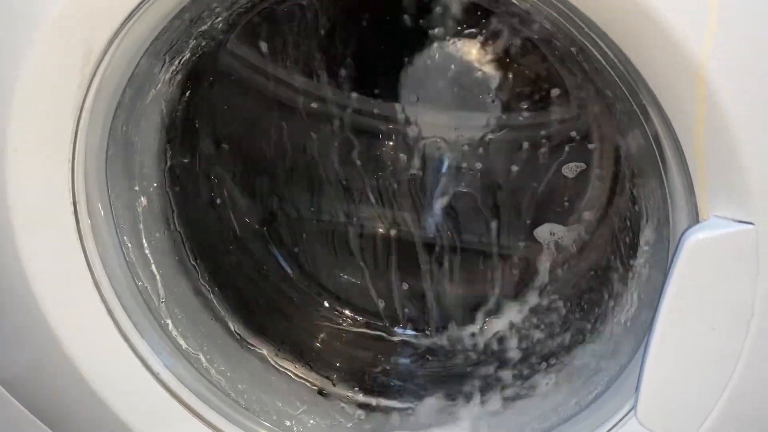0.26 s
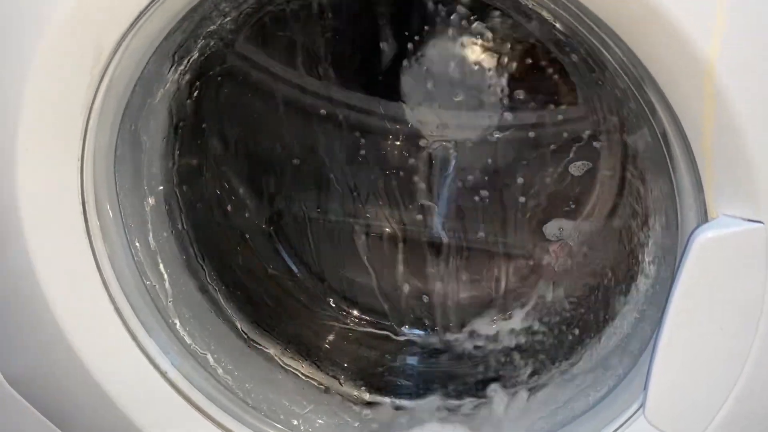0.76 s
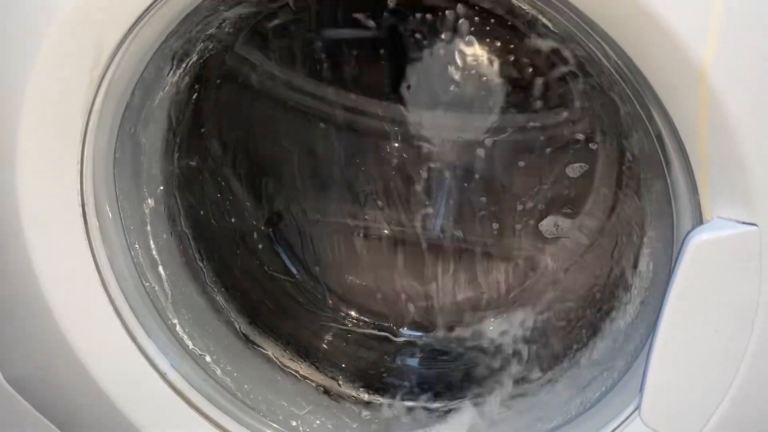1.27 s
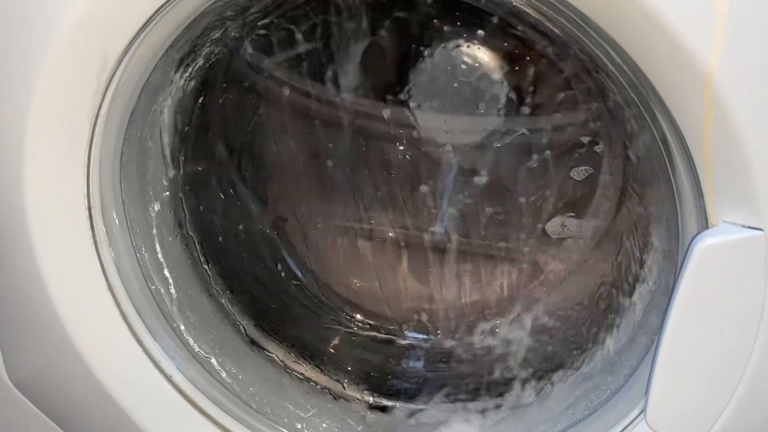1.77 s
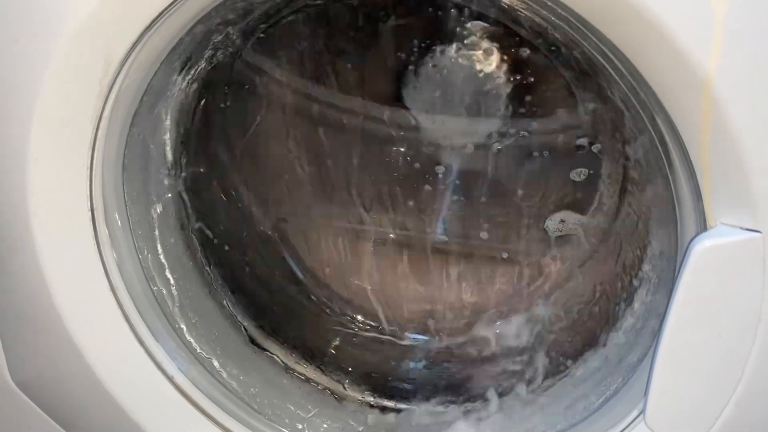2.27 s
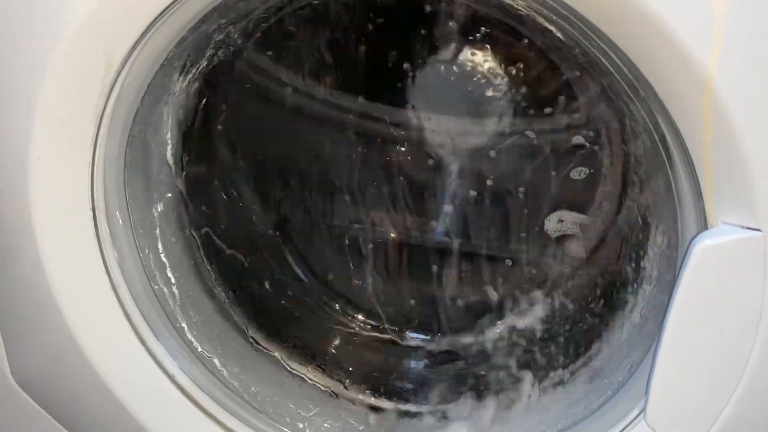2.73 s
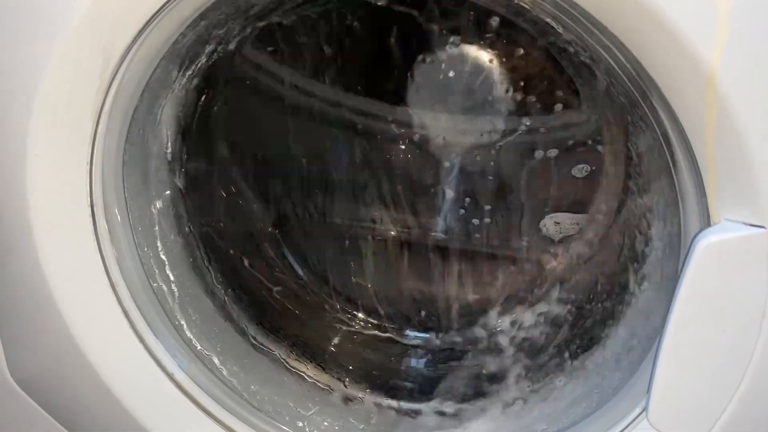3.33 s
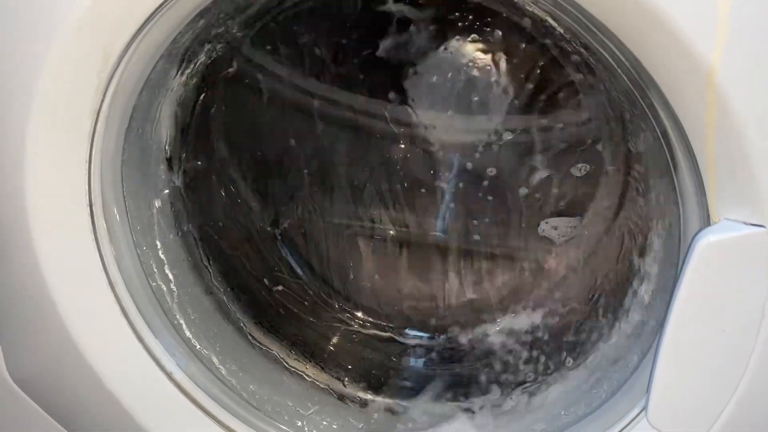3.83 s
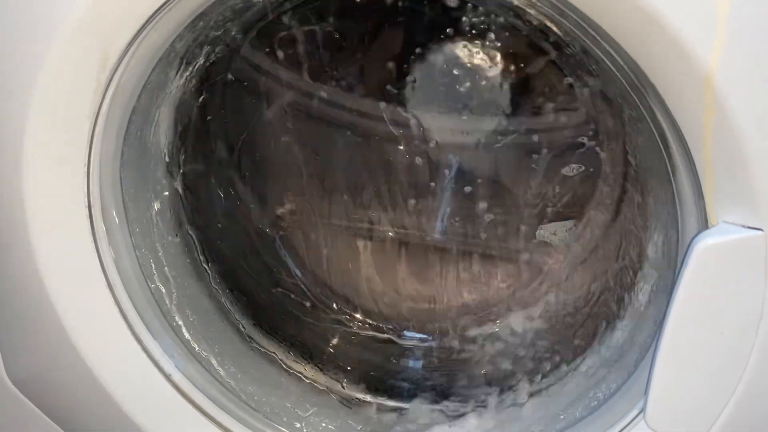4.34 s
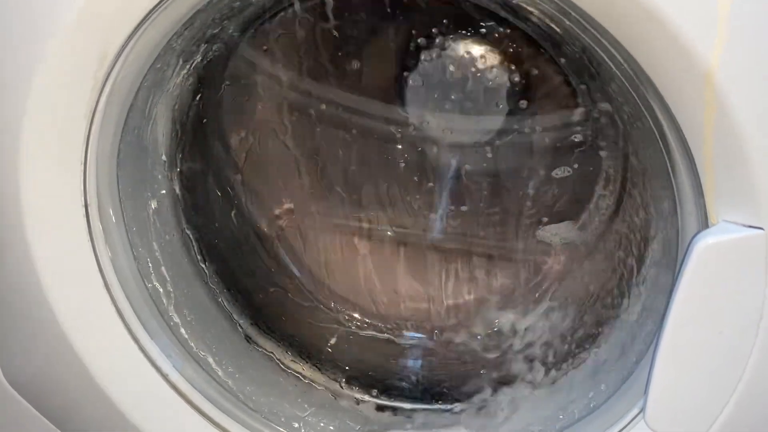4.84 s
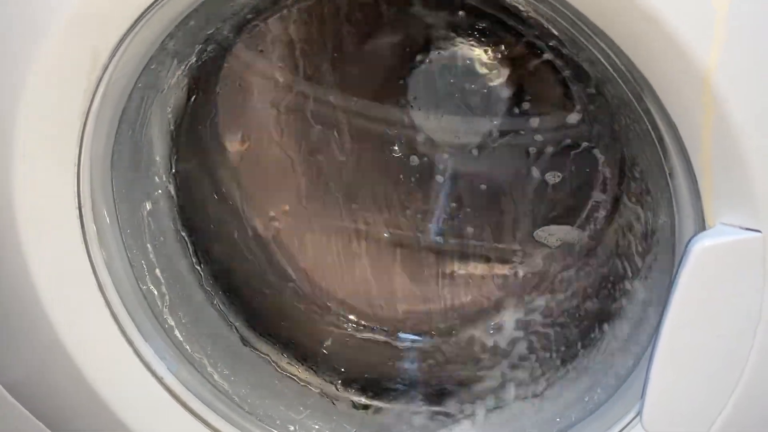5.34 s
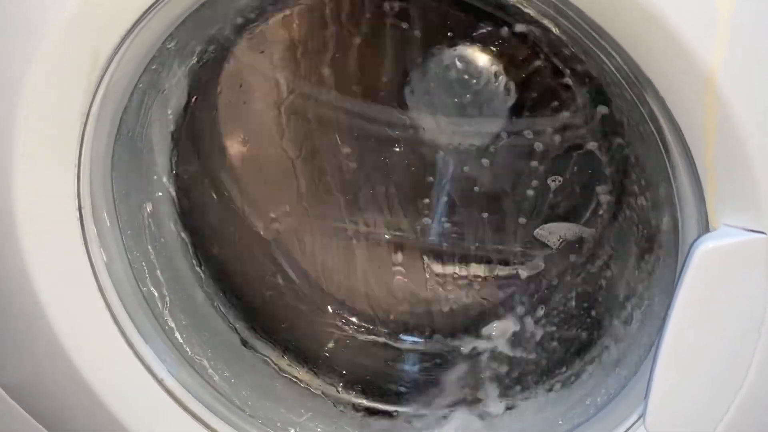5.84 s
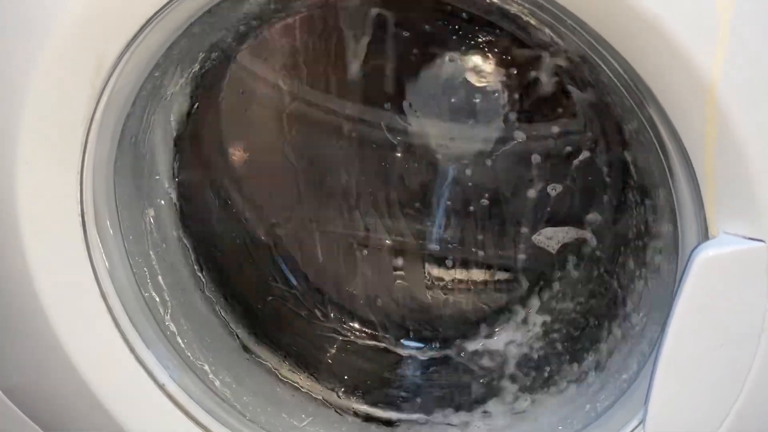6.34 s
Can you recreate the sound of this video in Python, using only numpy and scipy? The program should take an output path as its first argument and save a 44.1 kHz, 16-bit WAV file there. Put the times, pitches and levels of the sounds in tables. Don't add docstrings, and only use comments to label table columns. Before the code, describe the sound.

Close stereo capture of a front-loading washing machine already in fast spin indoors. A very loud, deep hum throbs about twenty times a second as the unbalanced drum jolts the cabinet. A loose part clatters in a quick repeating pattern over rattling, with a thin motor whine and broad watery hiss behind. Continuous throughout, slightly rougher in the middle, never stopping.

```python
import sys
import numpy as np
from scipy import signal
from scipy.fft import irfft
from scipy.io import wavfile
from scipy.ndimage import uniform_filter1d, map_coordinates

SR = 44100
rng = np.random.default_rng(int(sys.argv[2]) if len(sys.argv) > 2 else 0)


def linear_from_db(decibels):
    return 10 ** (np.asarray(decibels, float) / 20)


def wav_out(sig):
    wavfile.write(sys.argv[1], SR, np.round(np.clip(np.atleast_2d(sig).T, -1, 1) * 32767).astype(np.int16))


N = 291060
TIME = np.arange(N) / SR

# [t/s, speed/(turns per s)]
DRUM_SPEED = [(0.0, 19.656), (0.6, 19.776), (1.2, 19.837), (1.8, 19.874), (2.4, 19.883), (3.0, 19.872),
              (3.6, 19.838), (4.2, 19.795), (4.8, 19.761), (5.4, 19.728), (6.0, 19.706), (6.6, 19.695)]
# [f/Hz, density/dB per Hz]
HISS_SPECTRUM = [(20, -25), (70, -3.5), (370, -5), (800, -6.5), (1600, -8), (2100, -14), (3000, -16),
                 (4300, -20), (5500, -21.5), (6600, -23.5), (8500, -20), (11500, -23.5), (14000, -22),
                 (15700, -16.5)]
# [f/Hz, width/Hz, level/dB]
DOOR_MODES = [(363, 52, -3), (740, 22, 2), (770.4, 32, 10.5), (1175, 29, -6), (2390, 97, 1.5),
              (3000, 200, 4.5), (4290, 420, 5), (954, 75, 4), (1697, 62, -8), (1923, 37, -5),
              (2245, 39, -4), (2800, 46, -3.5), (3010, 43, -8), (7860, 170, -11.5)]
# [shaft order, level/dB]
MOTOR_ORDERS = [(14, -60), (15, -62), (16, -59), (17, -55), (19, -60), (22, -58), (25, -59), (30, -62),
                (31, -63), (33, -58), (34, -63), (37, -60), (40, -63), (41, -57), (42, -61), (43, -55),
                (44, -63), (45, -63), (53, -59), (55, -62), (58, -55), (61, -63), (62, -59), (64, -61),
                (65, -61), (66, -50)]
# [shaft order, free-running level/dB, climbing boost/dB, sagging boost/dB]
WHINES = [
    (18, -50, 2, 8),
    (36, -44, 3, 3.5),
]
# [drum order, f/Hz, width/Hz, peak level/dB, left minus right/dB]
PANEL_MODES = [(12, 238, 4, -41, -6), (12.5, 246.8, 1.6, -30, 0), (13, 257.2, 4, -35, -2),
               (18, 357.6, 3.5, -35, -3), (19, 374.5, 8, -43, 2)]
# [f/Hz, level/dB]
RATTLE_SPECTRUM = [(30, -12), (90, 5), (150, -11), (240, -7.5), (300, -7), (380, -4.5), (500, -10.5),
                   (620, -12), (690, -9)]
# [place/0-1, level/dB, brightness slope/dB per octave]
KNOCK_PATTERN = [
    (.04, -3, -4),
    (.13, -9, -6),
    (.37, -9, -2),
    (.53, 0, 3),
    (.6, -3, -5),
    (.69, -6, -7),
    (.76, -8, 0),
    (.865, -2, -2),
]
# [f/Hz, level/dB, t60/s]
PART_MODES = [(385, -3, .08), (550, -7, .07), (697, -3, .09), (765, 3, .06), (950, -6, .05),
              (1075, -5, .08), (1158, -2, .1), (1395, -1, .07), (1570, -8, .05), (2900, -17, .03)]
JOLTS = [
    (0.211, 0.14),
    (0.284, 0.48),
    (0.474, 0.86),
    (0.992, 0.76),
]
# [f/Hz, width/Hz, signed response]
CABINET_MODES = [(52.835, 5.44, -0.359), (111.708, 12.649, 0.254), (179.234, 2.0, 0.097),
                 (198.746, 3.542, 0.042), (161.352, 71.934, -0.034)]
# [order, left/dB, right/dB, growth share, lag/rad], last two per 0.1 turns/s
ORDER_REACH = [(2, 2, -2, .1, 0), (3, 1.5, .5, .22, .4), (4, 1.5, -.6, .1, .35), (5, 1, -.7, -.1, .5),
               (6, .8, -1.2, 0, 0), (7, 2, 0, .35, 0), (8, 4, .5, 0, .7), (9, 4, -6, .1, 0),
               (10, 3, -5, .15, 0), (11, .5, -.5, .4, 0)]
# [f/Hz, shared part/0-1]
PORT_LIKENESS = [(30, 1), (100, .98), (300, .7), (600, .4), (1000, .3), (1600, .1), (3000, .6), (5500, .35),
                 (6800, .97), (8500, .995)]
# [f/Hz, left minus right/dB]
PORT_TILT = [(60, 16.5), (250, 0.5), (600, 1), (2000, 1), (5000, 2), (7000, 5), (9000, -0.9)]
# [f/Hz, phase/turns]
PORT_PHASE = [(0, 0), (500, -.05), (900, -.15), (1500, -.25), (2300, -.02), (3900, -.1), (4300, -.17),
              (4700, -.04), (5700, 0), (7100, 0), (9200, .5), (11100, 1), (13200, 1.5), (15250, 2),
              (16000, 2.2)]

BELT_RATIO, SHAFT_HZ = 11.99, 237.5
MEAN_SPEED, CRITICAL_SPEED, SPEED_MARGIN = 19.8, 19.775, .012
SHAKE_LAG_S = .4


def evened(x):
    return x / np.sqrt(np.mean(abs(x) ** 2) + 1e-20)


def read(points, hz):
    f, value = np.transpose(points)
    return np.interp(np.log(hz + 1), np.log(f + 1), value)


def above(speed, threshold):
    return .5 + .5 * np.tanh((speed - threshold) / (2 * SPEED_MARGIN))


def drift(top_hz):
    hz = np.geomspace(.15, top_hz, 20)
    t = TIME[::441, None]
    slow = (np.sin(2 * np.pi * (hz * t + rng.random(20))) / np.sqrt(hz)).sum(1)
    return np.interp(TIME, t[:, 0], evened(slow))


def ports(hz):
    tilt = linear_from_db(read(PORT_TILT, hz) / 2)
    phase = np.interp(hz, *np.transpose(PORT_PHASE))
    return np.array([tilt + 0j, np.exp(2j * np.pi * phase) / tilt])


def pair(shape, hz):
    a, b, c, d = rng.standard_normal((4,) + shape) / np.sqrt(2)
    left, own = a + 1j * b, c + 1j * d
    same = np.clip(read(PORT_LIKENESS, hz), 0, 1)
    right = same * left + np.sqrt(1 - same ** 2) * own
    return np.array([left, right]) * ports(hz)[:, None]


def cyclic(cycles, spectra, size):
    tables = irfft(spectra, size) * size / np.sqrt(2)
    tables = np.concatenate([tables, tables[..., :1]], axis=2)
    where = [np.linspace(0, spectra.shape[1] - 1, N), cycles % 1 * size]
    return np.array([map_coordinates(table, where, order=1) for table in tables])


def hiss(turns, shake):
    frames, hz = N // 256 + 5, np.fft.rfftfreq(1024, 1 / SR)
    patches = uniform_filter1d(rng.standard_normal((frames, 513)), 12, axis=0)
    patches = evened(uniform_filter1d(patches, 12, axis=1))
    peaks_db = sum(db / (1 + (2 * (hz - f) / width) ** 2) for f, width, db in DOOR_MODES)
    spectra = pair((frames, 513), hz) * linear_from_db(read(HISS_SPECTRUM, hz) + peaks_db + 0.25 * patches)
    noise = signal.istft(spectra.transpose(0, 2, 1), nperseg=1024, noverlap=768)[1]
    noise = evened(noise[:, :N])
    pulse_db = 0.71 * np.cos(np.pi * turns - 4.1)
    pulse_db += 0.85 * np.cos(2 * np.pi * turns - 1.2)
    pulse_db += 0.72 * np.cos(4 * np.pi * turns - .7)
    body = signal.sosfiltfilt(signal.butter(3, 4500, fs=SR, output="sos"), noise)
    treble = noise - body
    return linear_from_db(-27.5) * (linear_from_db(3 + 0.36 * shake + pulse_db) * body + linear_from_db(.3 * pulse_db) * treble)


def motor(turns, climbing, sagging):
    shaft, order = BELT_RATIO * turns, np.arange(67)
    level_db = np.full(67, -66.) - 60 * (order < 14)
    for k, db in MOTOR_ORDERS:
        level_db[k] = db
    level_db[[18, 36]] = -90
    steady = np.exp(2j * np.pi * rng.random(67))
    contact = rng.standard_normal((200, 67)) + 1j * rng.standard_normal((200, 67))
    flicker = .85 * steady + .5 * contact
    out = cyclic(shaft, linear_from_db(level_db + 3.2) * flicker * ports(order * SHAFT_HZ)[:, None], size=2048)
    beat = np.exp(-2j * np.pi * (turns - .045))
    out *= 1 + .1 * beat.real
    for k, db, climb_db, sag_db in WHINES:
        k = round(k)
        slip = uniform_filter1d(rng.standard_normal(N), 500)
        wander = k * .014 * evened(uniform_filter1d(slip, 500))
        level = linear_from_db(db + climb_db * climbing + sag_db * sagging + drift(1.2))
        tone = np.sqrt(2) * level * np.exp(1j * (2 * np.pi * k * shaft + wander))
        loaded = tone * (1 + (k / 52) ** 2 * beat)
        out += (ports(k * SHAFT_HZ)[:, None] * loaded).real
    return out * (1 + .12 * np.cos(4 * np.pi * turns + 1.3))


def panels(turns, speed):
    out = np.zeros((2, N))
    for order, hz, width, db, left_db in PANEL_MODES:
        tuned = 1 / (1 + (2 * (order * speed - hz) / width) ** 2)
        balance_db = np.array([[left_db], [-left_db]]) / 2
        level = tuned * linear_from_db(db + 3 + drift(2.0) + balance_db)
        out += level * np.cos(2 * np.pi * order * turns + 0.83 * drift(2.5) + 6 * rng.random())
    return out


def rattle(turns):
    half = np.arange(72)
    hz = half * 9.9
    odd = half % 2
    heard = (half > 4) * ((half > 22) | (odd == 1))
    gain = linear_from_db(read(RATTLE_SPECTRUM, hz) - 6 * odd) * heard
    spectra = pair((16, len(half)), hz) * gain
    return linear_from_db(-27) * evened(cyclic(turns / 2, spectra, size=4096))


def knocks(turns, shake):
    cycles, t, out = np.arange(-1, 67), np.arange(4400) / SR, np.zeros((2, N))
    places, dbs, slopes = np.transpose(KNOCK_PATTERN)
    chance = rng.standard_normal((len(cycles), len(places), 1 + len(PART_MODES)))
    blow_turns = 2 * (cycles[:, None] + places + 0.0015 * chance[..., 0])
    at = np.interp(blow_turns, turns, np.arange(N), 0, N).astype(int)
    signs = rng.choice([-1., 1.], (len(PART_MODES), len(places)))
    swing = 1 - np.exp(-t / .003)
    for k, (hz, db, t60) in enumerate(PART_MODES):
        octaves = np.log2(hz / 700)
        blows = np.zeros(N + 1)
        blows[at] = signs[k] * linear_from_db(dbs + slopes * octaves + 1.4 * chance[..., k + 1])
        blows[1:] *= linear_from_db(-3 * octaves * (1 - shake))
        ring = linear_from_db(db - 60 * t / t60) * swing * np.exp(2j * np.pi * hz * t)
        apart = np.exp(.5j * np.array([[-1], [1]]) * rng.uniform(-1, 1))
        ringing = signal.oaconvolve(blows[1:N], ring)[:N]
        out += (apart * ports(hz)[:, None] * ringing).real
    out = signal.sosfilt(signal.butter(3, 280, "high", fs=SR, output="sos"), out)
    return linear_from_db(-33 + 2.5 * shake) * evened(out)


def hum(speed, turns):
    out = np.zeros((2, N))
    slow_speed = speed[::64]
    faster = 10 * (slow_speed - MEAN_SPEED)
    for order, left_db, right_db, growth, lag in ORDER_REACH:
        hz = order * slow_speed
        force = sum(strength * np.exp(-2j * np.pi * order * place) for place, strength in JOLTS)
        response = sum(a * 1j * hz * w / (f * f - hz * hz + 1j * hz * w) for f, w, a in CABINET_MODES)
        motion = force * response * (1 + growth * faster) * np.exp(-1j * lag * faster)
        motion = np.repeat(motion, 64)[:N]
        reach = linear_from_db(np.array([[left_db], [right_db]]))
        out += reach * (motion * np.exp(2j * np.pi * order * turns)).real
    return out


def scene():
    speed = np.interp(TIME, *np.transpose(DRUM_SPEED))
    turns = .092 + np.cumsum(speed) / SR
    shake = above(np.interp(TIME - SHAKE_LAG_S, TIME, speed), CRITICAL_SPEED)
    panel_speed = np.interp(TIME - SHAKE_LAG_S / 2, TIME, speed)
    slow = 1 - above(speed, MEAN_SPEED - SPEED_MARGIN)
    late = TIME > TIME[speed.argmax()]
    background = hiss(turns, shake) + motor(turns, slow * ~late, slow * late)
    body = panels(turns, panel_speed) + rattle(turns)
    return background + body + knocks(turns, shake) + hum(speed, turns)


def band_limit(x):
    return signal.sosfilt(signal.butter(12, 17050, fs=SR, output="sos"), x)


def record(dry):
    knee, headroom = .7, .24
    over = np.maximum(abs(dry) - knee, 0)
    held = dry - np.sign(dry) * (over - headroom * np.tanh(over / headroom))
    edge = signal.firwin(767, 15755, window=("kaiser", 9), fs=SR)
    mix = signal.oaconvolve(held, edge[None], "same") + .0044
    return band_limit(mix)


dry = scene()
out = record(dry)
wav_out(out)
```